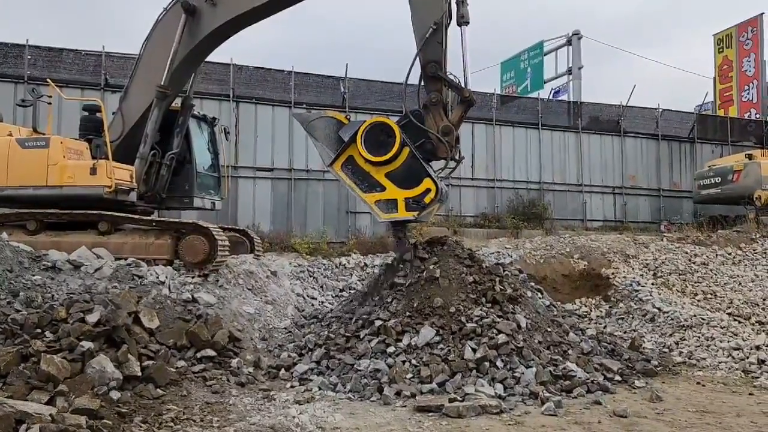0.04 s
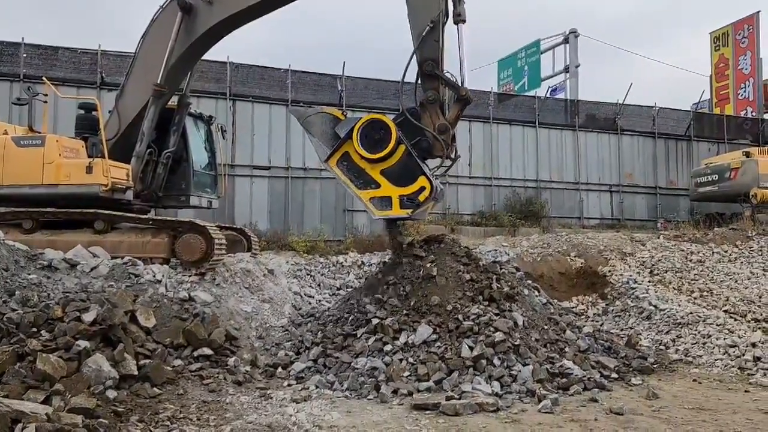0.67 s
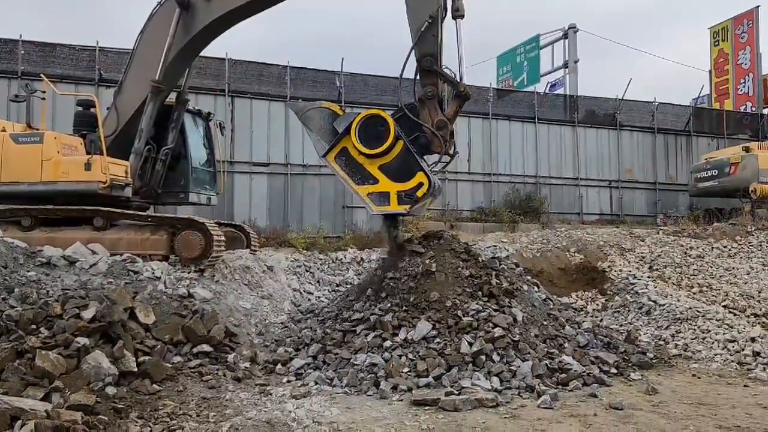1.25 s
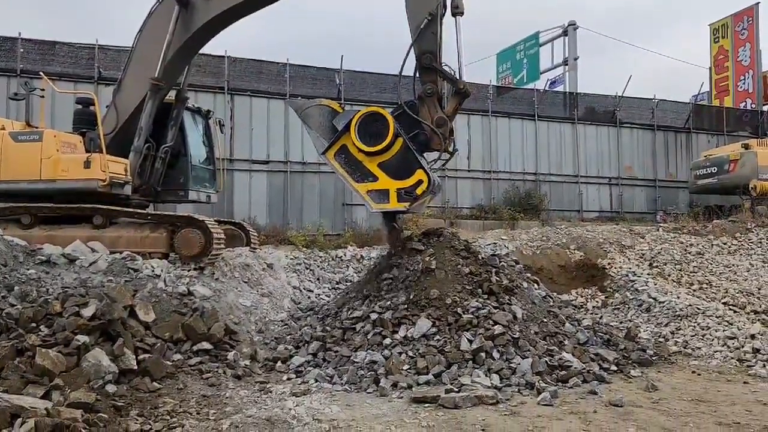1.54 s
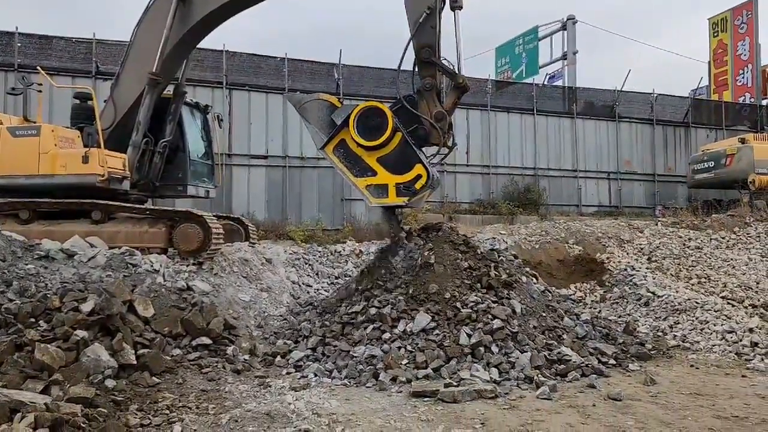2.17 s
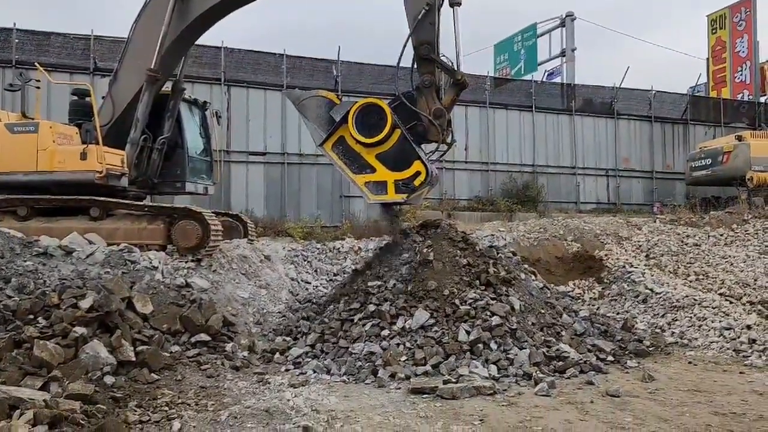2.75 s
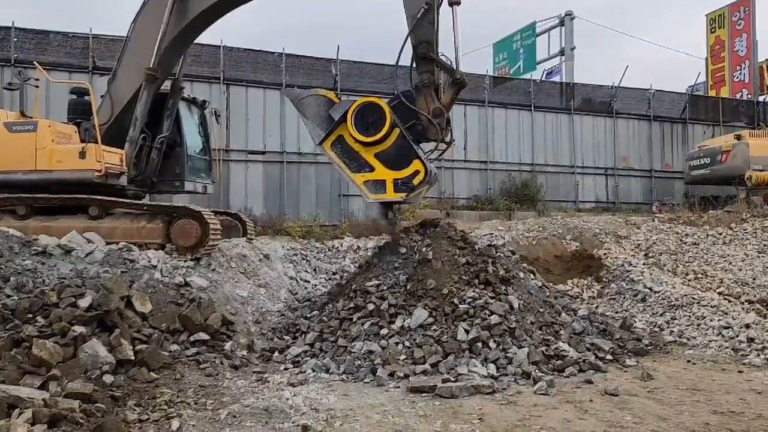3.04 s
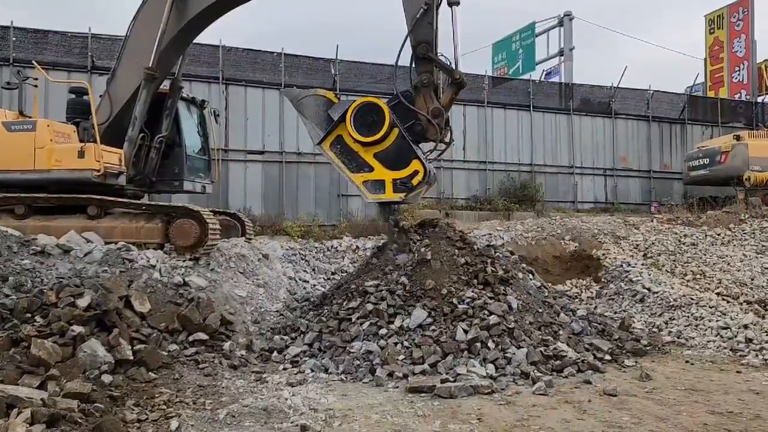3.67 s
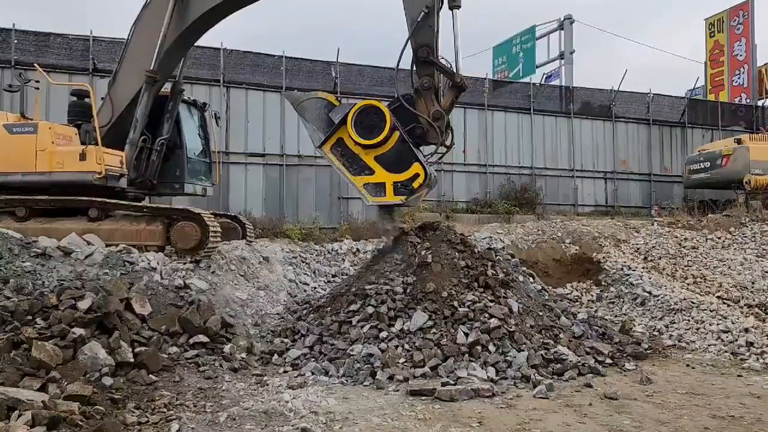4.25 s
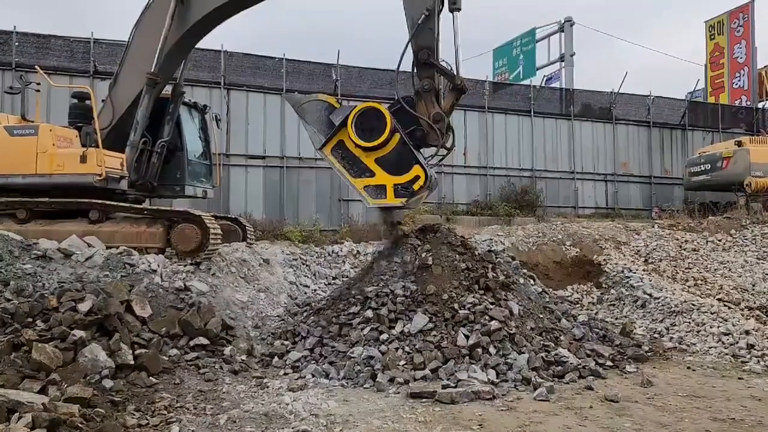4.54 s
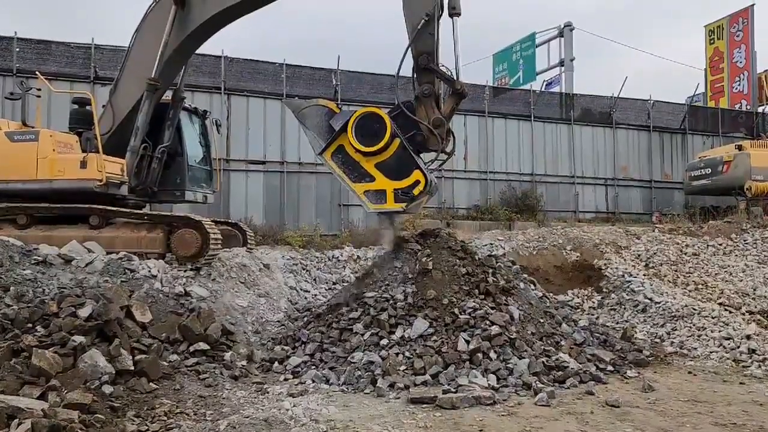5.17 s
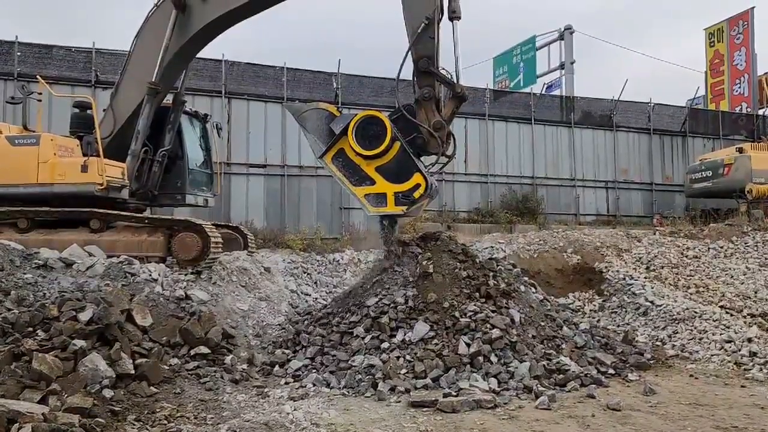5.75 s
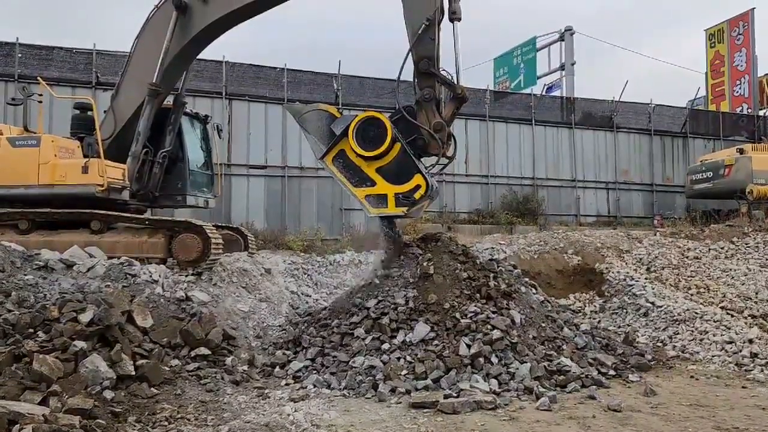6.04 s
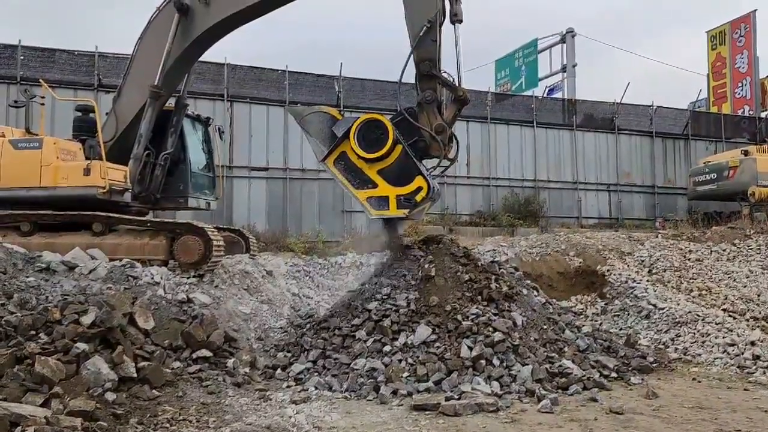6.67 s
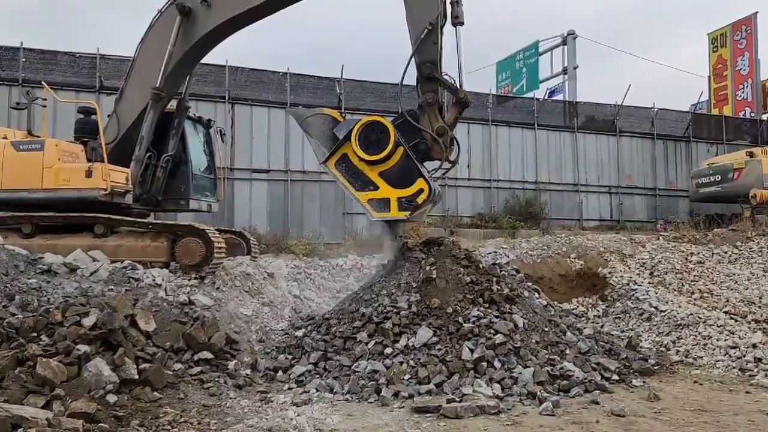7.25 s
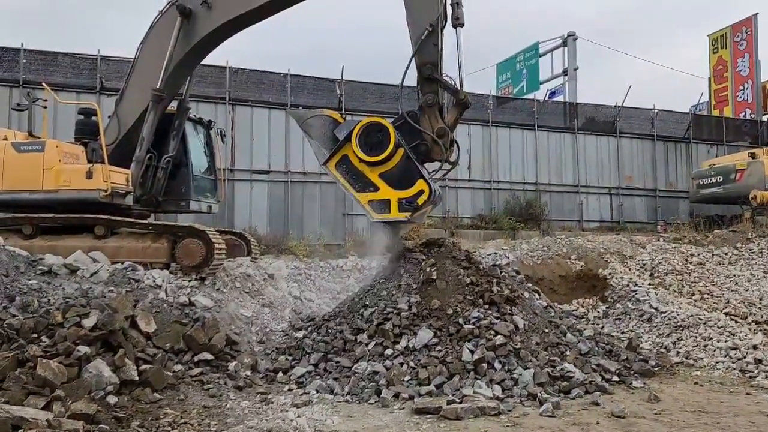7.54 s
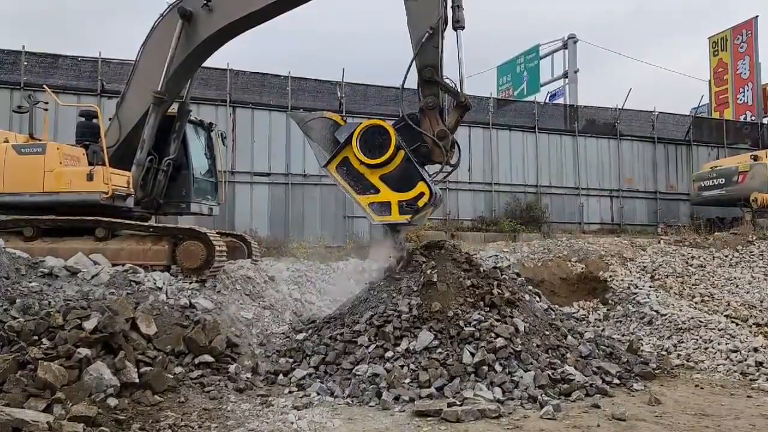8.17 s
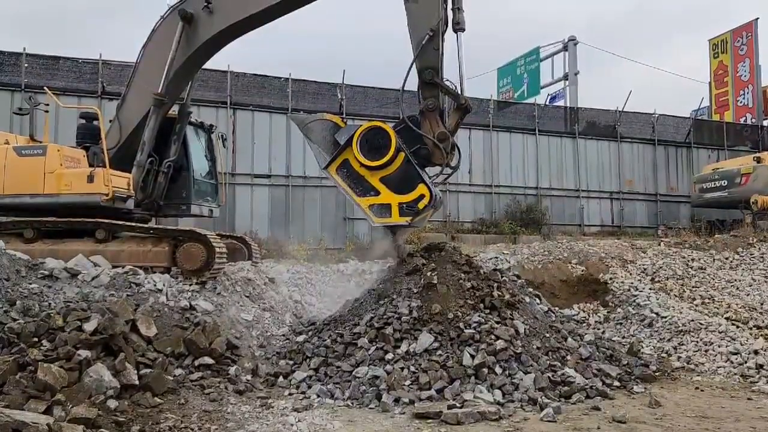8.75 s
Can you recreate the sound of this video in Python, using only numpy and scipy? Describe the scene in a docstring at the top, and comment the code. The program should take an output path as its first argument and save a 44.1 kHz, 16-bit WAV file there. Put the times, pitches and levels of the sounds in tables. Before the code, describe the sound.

Rapid, uneven pounding runs throughout as a steel crusher bucket breaks concrete rubble, heard outdoors from several metres away, nearly centred. Lumps tumble, stones clack and grit hisses onto a pile above the low drone of an excavator's diesel. The jaw briefly grinds with rough groans, then slabs snap and heavy pieces bang against the plates. The metal rings more as the bucket empties, singing faintly toward the end.

```python
"""Jaw crusher on a rubble heap

An excavator holds a crusher bucket over rubble, some metres away in front of a sheet-metal fence.
The jaw bites seven or eight times a second: concrete fractures, and the impacts excite the modes of
the steel bucket. Lumps tumble between bites and gravel streams onto the heap as a dense train of
collisions. Under it the diesel rumbles and the hydraulic pump hums, both periodic with the shaft."""
import sys
import numpy as np
from scipy import signal
from scipy.fft import rfft, irfft, next_fast_len
from scipy.io import wavfile
from scipy.ndimage import map_coordinates

SR = 44100
rng = np.random.default_rng(int(sys.argv[2]) if len(sys.argv) > 2 else 0)


def pcm_store(signal):
    """Save signal as 16-bit PCM."""
    levels = np.round(np.clip(np.atleast_2d(signal), -1, 1) * 32767)
    wavfile.write(sys.argv[1], SR, levels.astype(np.int16).T)


N = 388080


# spectrum of crunching concrete: frequency_hz, density_db
CRUNCH_SPECTRUM = [(120, -25), (350, -7), (560, 6), (720, 5), (850, -7), (1030, 0), (1300, -9.5),
                   (1600, -7), (2200, -7.5), (2480, -23), (3700, -21), (6000, -47)]
def crusher():
    """Superposition: booms, fractures and impacts add up; cracks and booms also drive the steel plates."""
    times, boom_db, crunch_db, spray_db = bites()
    boom = bucket_boom(times, boom_db) + hollow_modes(times, boom_db)
    lumps, rattle = tumbling()
    boom += lumps
    fractures = contacts(rate=1500, spread_db=2, clump=.25)
    cracks = bursts(zip(times, crunch_db + 1.5), fractures, rise=.015, fall=.03, lag=-.003, colour_db=3)
    cracks += rattle
    crunch = through(amp(-2.5) * cracks, pulse(CRUNCH_SPECTRUM))
    fragments = grit_spray(times, spray_db) + splinter_spills() + slab_snaps()
    impacts = stone_clacks() + plate_knocks()
    return boom + crunch + fragments + impacts + plate_ring(cracks + amp(-19) * boom)


# progress of the jaw, whose drive slows under load: time_s, stroke_count
JAW_STROKES = [(.082, 0), (1.439, 11), (2.618, 21), (3.525, 28), (3.899, 31), (4.053, 32), (4.768, 37),
               (5.275, 41), (6.094, 47), (6.722, 51), (6.982, 53), (7.428, 57), (8.084, 62), (8.802, 67)]
# strength of an ordinary bite: time_s, boom_db, crunch_db, spray_db
BITE_LEVELS = [(.08, -15, -29, -58), (.56, -9.5, -20.5, -43.5), (.85, -15, -26, -39.5),
               (1.32, -9.5, -21.5, -31), (1.56, -32, -49, -48), (2.45, -22.5, -35, -38),
               (2.75, -17, -17, -37), (3.35, -16, -25.5, -38), (3.55, -7, -18, -28),
               (4.45, -15, -21.5, -34), (5.6, -6.5, -28, -37), (6.72, -13.5, -28, -37),
               (6.95, -17, -33, -43), (7.25, -9, -28.5, -33), (8.4, -18.5, -26.5, -44),
               (8.8, -8.5, -32, -47)]
# bites that break a hard slab: time_s, extra_db
HARD_SLABS = [(.69, 5.5), (1.19, 5), (1.44, 14.5), (3.14, 5.5), (3.52, 0), (3.9, 1.5), (4.06, 0.5),
              (4.19, 1.5), (4.47, 4), (4.62, 7), (5.03, 3), (5.28, 9), (5.55, 5.5), (5.96, 6), (6.09, 10.5),
              (6.41, 4.5), (6.56, 6), (6.72, 7.5), (7.95, 10.5), (8.08, 7.5)]
def bites(boom_share=.59, spray_share=.75):
    """Quasi-periodic forcing: one bite a stroke; boom and spray take a share of a hard slab's extra dB."""
    jaw_s, strokes = np.transpose(JAW_STROKES)
    times = np.interp(np.arange(strokes[-1] + 1), strokes, jaw_s)
    load_s, *levels = np.transpose(BITE_LEVELS)
    boom_db, crunch_db, spray_db = (np.interp(times, load_s, level) for level in levels)
    hard_db = np.zeros(len(times))
    for s, db in HARD_SLABS:
        hard_db[np.abs(times - s).argmin()] = db
    return times, boom_db + boom_share * hard_db, crunch_db + hard_db, spray_db + spray_share * hard_db


# response of the bucket to a blow: frequency_hz, density_db
BOOM_SPECTRUM = [(25, -36.5), (55, -10), (100, -7.5), (141, 3), (183, -4), (222, -1.5), (262, -7),
                 (380, -12.5), (650, -17), (1100, -35), (3000, -83)]
# heavy lumps dropping inside the bucket: time_s, level_db
LUMP_DROPS = [(1.205, -20), (1.86, -14.5), (3.266, -10), (3.803, -3.5), (4.188, -2.5), (4.661, -11.5)]
def bucket_boom(times, boom_db):
    """Impact excitation: each bite or dropped lump sends a flurry of blows through the bucket."""
    blows = through(contacts(rate=1100, spread_db=2, clump=0), pulse(BOOM_SPECTRUM))
    events = [*zip(times, boom_db), *LUMP_DROPS]
    return amp(-9) * bursts(events, blows, rise=.022, fall=.035, lag=-.00091, colour_db=2.5)


# modes of the whole bucket: frequency_hz, relative_db
BUCKET_MODES = [(140, -4), (222, -9)]
def hollow_modes(times, boom_db, t60=.11):
    """Free vibration: each bite jolts the bucket, whose two hollow modes ring in random shares."""
    track = np.zeros(N)
    for s, db in zip(times, boom_db):
        for hz, mode_db in BUCKET_MODES:
            ring = clink(hz, t60, count=1, detune=.04)
            add(track, s - 1 / hz, amp(db + mode_db + 2 * rng.standard_normal()) * ring)
    return track


# rubble moving between the bites: time_s, lumps_db, rattle_db
RUBBLE_FLOW = [(0, -21.5, -26), (1.6, -23, -30), (1.93, -22, -27.5), (2.1, -33, -30.5), (2.55, -28, -26.5),
               (3.05, -25, -26), (3.6, -25, -19.5), (4.05, -19.5, -23), (4.42, -22.5, -28.5),
               (5.3, -21.5, -30), (6.9, -21, -29), (7.35, -25.5, -26), (7.72, -23, -29.5),
               (8.1, -22.5, -29)]
def tumbling():
    """Shot noise: random collisions give the boom of lumps and the bare impulses of rattling stones."""
    lumps_db, rattle_db = curves(RUBBLE_FLOW)
    blows = amp(lumps_db - 1 + .88 * wobble(12)) * contacts(rate=400, spread_db=.5, clump=.2)
    rattle = amp(rattle_db - 3) * contacts(rate=1300, spread_db=2, clump=.4)
    return through(blows, pulse(BOOM_SPECTRUM)), rattle


# lumps striking one plate of the bucket: start_s, peak_db, pitch_hz
PLATE_HITS = [(1.197, -9, 250), (1.205, -12, 720), (2.6, -11, 165), (3.794, -9, 680), (4.055, -11, 680),
              (4.176, -10, 560), (4.352, -8, 140), (4.462, -13.5, 980), (4.598, -8, 135), (4.762, -12, 165),
              (5.146, -12.5, 640), (5.405, -9, 145), (5.545, -12, 650), (5.818, -11, 145), (6.1, -11, 290),
              (6.396, -11, 300), (6.54, -11, 145), (7.96, -11, 420), (8.082, -9, 710)]
def plate_knocks(t60=.13):
    """Modal damping: a struck plate's close modes ring for t60 at 200 Hz, less at a higher pitch."""
    track = np.zeros(N)
    for s, db, hz in PLATE_HITS:
        ring = clink(hz, t60 * np.sqrt(200 / hz), count=9, detune=.1)
        add(track, s, amp(db) * ring / np.abs(ring).max())
    return track


# loose stones striking: start_s, peak_db, pitch_hz
STONE_HITS = [(.189, -13.5, 1000), (.546, -20, 3000), (.677, -14, 754), (1.842, -17.5, 1300),
              (2.104, -14.5, 2250), (2.854, -15.5, 1880), (4.312, -11, 574), (8.382, -14, 1750),
              (8.431, -13, 637)]
def stone_clacks(t60=.032):
    """Heavy damping: a stone's cluster of modes dies so fast that it is heard as a dry clack."""
    track = np.zeros(N)
    for s, db, hz in STONE_HITS:
        clack = clink(hz, t60, count=12)
        add(track, s, amp(db) * clack / np.abs(clack).max())
    return track


# slabs snapping in two: time_s, level_db
SLAB_BREAKS = [(.571, -23), (1.061, -25), (1.182, -18.5), (1.305, -23), (2.738, -23), (2.857, -23),
               (2.985, -26), (3.509, -21), (3.644, -21), (3.766, -22), (4.047, -22), (4.173, -22.5),
               (4.608, -21), (4.883, -20), (5.015, -27), (6.387, -28), (7.318, -28), (7.938, -22),
               (8.081, -28)]
# spectrum of a snap: frequency_hz, density_db
SNAP_SPECTRUM = [(200, -25), (600, 7.5), (1000, 5), (2000, 3.5), (6000, -11.5), (15000, -30)]
def slab_snaps():
    """Brittle fracture: a slab releases its strain in an abrupt burst of tiny cracks."""
    fractures = contacts(rate=2200, spread_db=2, clump=0)
    snaps = bursts(SLAB_BREAKS, fractures, rise=.001, fall=.013, lag=0, colour_db=3)
    return through(snaps, pulse(SNAP_SPECTRUM))


# modes of the steel plates: frequency_hz, level_db, t60_s
PLATE_MODES = [(136, -1, .089), (223, -6, .15), (309, -4, .057), (531, -9, .11), (607, -9.5, .086),
               (673, -4, .13), (737, -4.5, .38), (960, -7, .07), (1074, -9, .2), (1566, -22, .051)]
# the emptying bucket rings more freely: time_s, gain_db
RING_GAIN = [(0, -20), (2.9, -16.5), (4.5, -9.5), (7.8, -6.5)]
def plate_ring(drive):
    """Resonance: the drive is convolved with the plates' impulse response, a sum of decaying sines."""
    gain_db, = curves(RING_GAIN)
    t = np.arange(SR // 2) / SR
    drive = diffuse(drive)
    ring = sum(amp(db - 60 * t / t60) / np.sqrt(t60) * np.sin(2 * np.pi * (hz * t + rng.random()))
               for hz, db, t60 in PLATE_MODES)
    return amp(gain_db) * through(drive, ring / np.linalg.norm(ring))


# spectrum of flying grit: frequency_hz, density_db
GRIT_SPECTRUM = [(700, -17.5), (2200, 9), (5000, 4.5), (7500, 0.5), (10000, -2), (11500, -2.5),
                 (15000, -6.5)]
def grit_spray(times, spray_db):
    """Shot noise: at each bite, grit sprays from the jaw in contacts so dense that they hiss."""
    grains = contacts(rate=4000, spread_db=0, clump=0)
    spray = bursts(zip(times, spray_db), grains, rise=.021, fall=.025, lag=-.004, colour_db=1.5)
    return through(spray, pulse(GRIT_SPECTRUM))


# groans after bites that do not break through: start_s, level_db
JAW_GROANS = [(2.748, -14.5), (2.875, -21), (2.997, -15.5), (3.12, -16.5), (3.43, -20), (3.52, -19.5)]
# low modes of the jaw plate: frequency_hz, relative_db
JAW_MODES = [(220, 4.5), (537, -4.5), (1076, -13)]
def groan(rise_s=.008, hold_s=.032, fall_s=.018):
    """Stick-slip friction: concrete keeps the jaw plate's modes going in a short, rough tone."""
    t = np.arange(N) / SR
    envelope, tone = np.zeros(N), np.zeros(N)
    for s, db in JAW_GROANS:
        envelope += amp(db) * np.exp(np.minimum(t - s, 0) / rise_s - np.maximum(t - s - hold_s, 0) / fall_s)
    for hz, db in JAW_MODES:
        gain = amp(db + 2 * wobble(35))
        cycles = np.cumsum(hz * (1 + .03 * wobble(70))) / SR
        tone += gain * np.sin(2 * np.pi * cycles)
    return envelope * unit(tone)


# singing of the nearly empty bucket: time_s, level_db
SINGING_LEVEL = [(6.9, -52), (7.4, -34), (7.85, -37.5), (8.15, -33), (8.5, -48)]
# longest-ringing plate modes: frequency_hz, relative_db
SINGING_MODES = [(737.5, 0), (1068, -18)]
def singing():
    """Sustained resonance: the running jaw keeps lightly damped modes in a clean, wavering tone."""
    level_db, = curves(SINGING_LEVEL)
    t = np.arange(N) / SR
    tone = sum(amp(db + 1.5 * wobble(12)) * np.sin(2 * np.pi * hz * t + .4 * wobble(18))
               for hz, db in SINGING_MODES)
    return amp(level_db) * unit(tone)


# crushed stone falling on the heap: time_s, gravel_db, sand_db
STREAM_LEVELS = [(0, -33.5, -37), (1.12, -37, -45), (1.47, -34, -37.5), (3.05, -36, -42.5),
                 (3.7, -34.5, -40), (4.3, -42, -41.5), (5, -39.5, -41), (5.45, -44.5, -44.5),
                 (6.2, -40.5, -36.5), (6.9, -43.5, -44.5), (7.3, -38, -48), (7.72, -49, -44.5),
                 (8.8, -38.5, -42.5)]
# spectra of gravel and sand impacts: frequency_hz, density_db
GRAVEL_SPECTRUM = [(600, -20), (1300, 12.5), (2200, 7.5), (3800, 6.5), (4800, -1.5), (7500, -3),
                   (10000, -9), (15000, -19)]
SAND_SPECTRUM = [(2000, -32), (5000, -2), (7500, -0.5), (10000, -8), (12000, -2), (15000, -8.5)]
def gravel_stream():
    """Granular flow: countless impacts merge into surging noise, with single chips clicking through."""
    gravel_db, sand_db = curves(STREAM_LEVELS)
    grains = through(contacts(rate=5800, spread_db=-2, clump=.38), pulse(GRAVEL_SPECTRUM))
    sand = through(contacts(rate=9000, spread_db=6, clump=.35), pulse(SAND_SPECTRUM))
    pebbles = chips(centre_hz=2800, octaves=.9, t60=.035, count=900)
    splinters = chips(centre_hz=7000, octaves=.6, t60=.018, count=800)
    surge_db = 1.4 * wobble(28)
    coarse = amp(-3) * grains + amp(-9) * pebbles
    fine = amp(-5.5) * sand + amp(-12.5) * splinters
    return amp(gravel_db + 1.84 * surge_db) * coarse + amp(sand_db + surge_db) * fine


def chips(centre_hz, octaves, t60, count):
    """Free vibration of small bodies: chips clink at random moments, most of them faintly; rms 1."""
    track = np.zeros(N)
    for when, pitch, size in rng.random((count, 3)):
        hz = centre_hz * 2 ** (octaves * (2 * pitch - 1))
        strength = amp(12 * size ** 2) * np.sqrt(centre_hz / hz)
        add(track, when * N / SR, strength * clink(hz, t60, count=2))
    return unit(track)


# splinters spat from the jaw: time_s, level_db
SPLINTER_FALLS = [(.435, -36), (1.428, -33), (1.485, -34), (3.133, -32), (3.51, -27), (3.655, -30),
                  (3.88, -33), (4.18, -29.5), (5.679, -36), (5.962, -35), (6.095, -31), (6.563, -34),
                  (7.158, -38), (7.206, -32), (7.268, -38), (7.315, -33), (7.423, -33), (8.188, -39),
                  (8.398, -38), (8.515, -38), (8.641, -39)]
def splinter_spills():
    """Brief contacts radiate high frequencies: a few splinters tick on the heap."""
    ticks = contacts(rate=1200, spread_db=2, clump=0)
    spills = bursts(SPLINTER_FALLS, ticks, rise=.001, fall=.012, lag=0, colour_db=4)
    return through(spills, pulse(SAND_SPECTRUM))


# strength of the exhaust and of the hydraulic pump: time_s, level_db
EXHAUST_LEVEL = [(0, -20), (.8, -17.5), (1.4, -21.5), (1.9, -22.5), (2.1, -29), (2.25, -24), (2.7, -28),
                 (3.6, -18), (4.3, -25)]
PUMP_LEVEL = [(1.55, -33.5), (1.7, -25.5), (2.0, -30), (2.12, -43)]
# tones of exhaust and pump: firing_rate_multiple, relative_db
ENGINE_ORDERS = [(1, 5.5), (1.5, -2), (5, -10.5), (6.24, -13)]
# spectrum of the engine's clatter: frequency_hz, density_db
CLATTER_SPECTRUM = [(40, -29.5), (62, 11), (110, 14), (200, 5), (320, -40), (405, 6.5), (450, -20),
                    (520, 3.5), (620, -14.5), (850, -7.5), (2000, -33.5)]
def diesel(firing_hz=80.66, clatter_db=-29.5, throb=.44):
    """Periodic excitation: firings give the exhaust tone and chop the clatter; the pump keeps in step."""
    exhaust_db, = curves(EXHAUST_LEVEL)
    pump_db, = curves(PUMP_LEVEL)
    phase = 2 * np.pi * np.cumsum(firing_hz * (1 + .009 * wobble(9))) / SR
    tones = sum(amp(db + 3 * wobble(18)) * np.sin(order * phase + .45 * wobble(25))
                for order, db in ENGINE_ORDERS)
    gas = through(rng.standard_normal(N), pulse([(20, -23.5), (55, -1), (110, 7.5), (250, -45.5)]))
    exhaust = amp(exhaust_db - 4.5) * (unit(tones) + amp(-2) * gas)
    pistons = np.sin(3.12 * phase + .12 * wobble(30))
    pump = amp(pump_db) * unit(amp(1.8 * wobble(20)) * pistons)
    clatter = through(rng.standard_normal(N) * (1 + throb * np.cos(phase)), pulse(CLATTER_SPECTRUM))
    return exhaust + pump + amp(clatter_db) * unit(clatter)


def reflections(x, t60, delay_s, patterns=30):
    """Reverberation: rubble and fence return decaying echoes, whose pattern changes as stones shift."""
    t = np.arange(SR // 3) / SR
    hop = N // patterns
    track = np.zeros(N)
    for start in range(0, N, hop):
        tail = rng.standard_normal(len(t)) * amp(-60 * t / t60)
        echoes = signal.fftconvolve(x[start:start + hop], tail / np.linalg.norm(tail))
        add(track, start / SR + delay_s, echoes)
    return track


def diffuse(x):
    """Decorrelation: scattering randomises the phases; the power is kept."""
    spectra = signal.stft(x, nperseg=256)[2]
    scattered = spectra * np.exp(2j * np.pi * rng.random(spectra.shape))
    return unit(signal.istft(scattered, nperseg=256)[1][:N]) * np.std(x)


def contacts(rate, spread_db, clump, slides=35):
    """Poisson process: rate impulses a second, rms 1; the share clump of the power comes in slides."""
    chosen = rng.random(N) < rate / SR
    sizes = amp(spread_db * np.clip(rng.standard_normal(N), -2, 2))
    starts = (rng.random(N) < slides / SR) * rng.exponential(1, N)
    slide = np.abs(through(starts, np.exp(-np.arange(SR // 10) / (.02 * SR))))
    envelope = np.sqrt(1 - clump + clump * slide / slide.mean())
    return unit(chosen * sizes * rng.choice([-1, 1], N) * envelope)


def bursts(events, grain, rise, fall, lag, colour_db):
    """Exponential growth and decay of grain at each (time_s, level_db); rise, fall and lag in seconds."""
    t = np.arange(-4096, 12288) / SR
    shape = np.exp(np.where(t < 0, t / rise, -t / fall))
    hz, knots = np.fft.rfftfreq(len(t), 1 / SR), np.geomspace(90, 16000, 56)
    track, grain = np.zeros(N), np.pad(grain, (0, SR), mode="wrap")
    for s, db in events:
        # each stone has resonances of its own
        colour = amp(colour_db * np.interp(hz, knots, rng.standard_normal(len(knots)), left=0))
        burst = irfft(rfft(shape * grain[round(abs(s) * SR):][:len(t)]) * colour)
        add(track, s + lag + t[0], amp(db) * burst * np.linalg.norm(shape) / (np.linalg.norm(burst) + 1e-9))
    return track


def clink(hz, t60, count, detune=.263):
    """Damped oscillation: a struck body's modes, scattered around hz, build up in a cycle and decay."""
    t = np.arange(round(t60 * SR)) / SR
    modes = hz * np.exp(detune * np.clip(rng.standard_normal((count, 1)), -1.5, 1.5))
    ring = np.sin(2 * np.pi * (modes * t + rng.random((count, 1)))).sum(0) / np.sqrt(count)
    return ring * amp(-60 * t / t60) * (1 - np.exp(-2 * hz * t))


def pulse(spectrum, size=8192):
    """Minimum phase: the causal pulse of energy 1 with this spectral shape."""
    cepstrum = irfft(np.log(amp(along(spectrum, np.fft.rfftfreq(size, 1 / SR)))))
    cepstrum[1:size // 2] *= 2
    cepstrum[size // 2 + 1:] = 0
    response = irfft(np.exp(rfft(cepstrum)))
    return response / np.linalg.norm(response)


def through(x, response):
    """Convolution: every sample of x sets off the impulse response."""
    return signal.oaconvolve(x, response)[:N]


def filtered(x, response):
    """Linear filtering: a gain that depends on frequency."""
    size = next_fast_len(N + 8192)
    return irfft(rfft(x, size) * response(np.fft.rfftfreq(size, 1 / SR)), size)[..., :N]


def wobble(rate):
    """Random modulation: a smooth curve with rate knots a second."""
    return map_coordinates(rng.standard_normal(2000), [np.arange(N) * rate / SR], mode="wrap")


def curves(rows):
    """Interpolation in time: one value per sample for each column after the first."""
    s, *columns = np.transpose(rows)
    return [np.interp(np.arange(N) / SR, s, column) for column in columns]


def along(points, hz):
    """Interpolation of (frequency_hz, value) points on a log axis."""
    frequencies, values = np.transpose(points)
    return np.interp(np.log(hz + 1), np.log(frequencies), values)


def add(track, s, x):
    """Superposition of x on the track from time s on."""
    start = round(s * SR)
    x = x[max(-start, 0):max(N - start, 0)]
    track[max(start, 0):][:len(x)] += x


def amp(db):
    """Decibels to gain."""
    return 10 ** (np.asarray(db) / 20)


def unit(x):
    """Normalisation to rms 1."""
    return x / np.sqrt(np.mean(x ** 2) + 1e-20)


# sideways scatter of the yard: frequency_hz, gain_db
SIDE_GAIN = [(30, 1), (120, -22), (280, -12), (600, -11), (1000, -1.5), (2000, -3), (5000, -2)]
def scene(left_lead_s=.00002):
    """Direct and diffuse fields: scatter widens the treble; a time lead sets the machine slightly left."""
    direct = crusher() + gravel_stream() + groan() + singing() + diesel()
    mid = direct + amp(-11) * reflections(direct, t60=.15, delay_s=.025)
    treble = lambda hz: hz ** 4 / (hz ** 4 + 800 ** 4)
    side_high = diffuse(filtered(mid, treble))
    side_low = filtered(reflections(direct, t60=.33, delay_s=0), lambda hz: 1 - treble(hz))
    side = filtered(side_high + side_low, lambda hz: amp(along(SIDE_GAIN, hz)))
    lead_s = left_lead_s * np.array([[.5], [-.5]])
    return filtered(np.array([mid + side, mid - side]), lambda hz: np.exp(2j * np.pi * hz * lead_s))


def record(dry):
    """Soft saturation rounds the highest peaks; a band limit removes everything above 15.5 kHz."""
    rounded = dry / (1 + np.abs(dry) ** 6) ** (1 / 6)
    return filtered(rounded, lambda hz: hz < 15500)


dry = scene()
out = record(dry)
pcm_store(out)
```